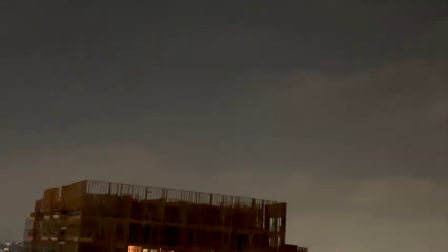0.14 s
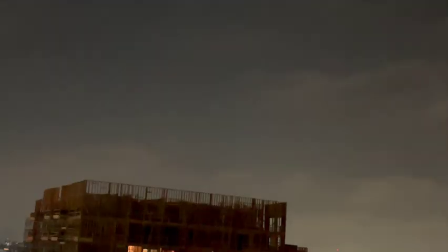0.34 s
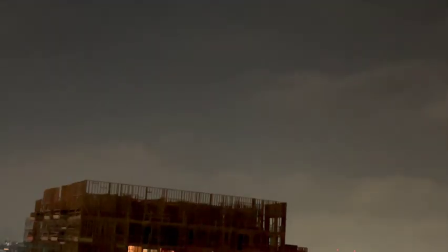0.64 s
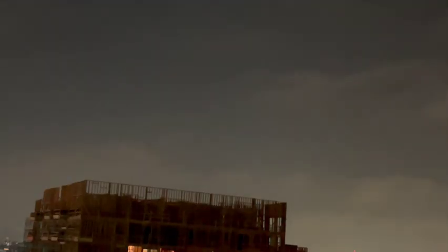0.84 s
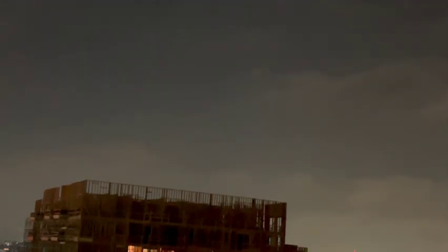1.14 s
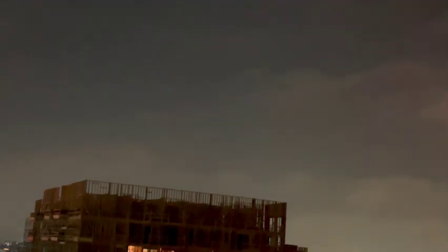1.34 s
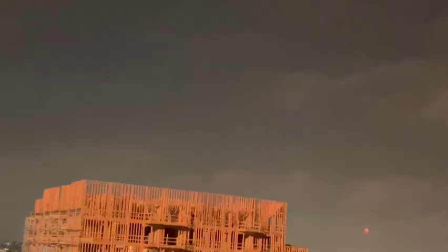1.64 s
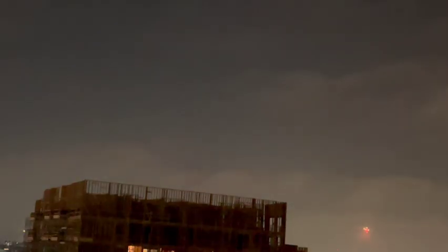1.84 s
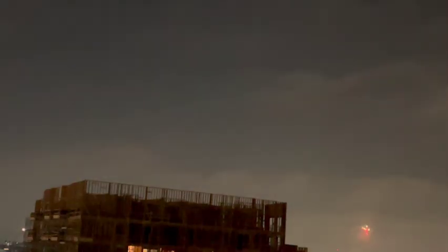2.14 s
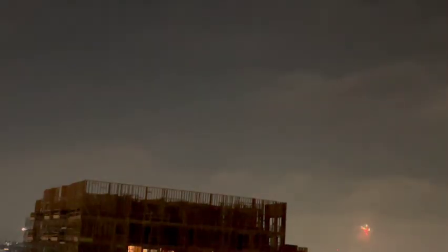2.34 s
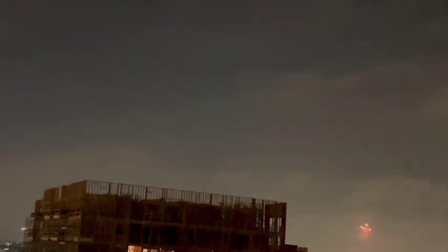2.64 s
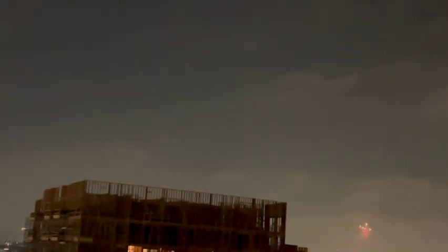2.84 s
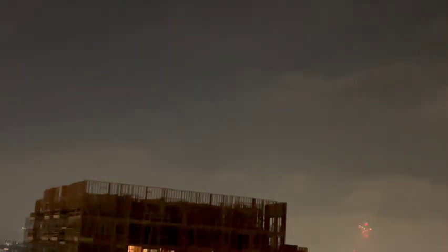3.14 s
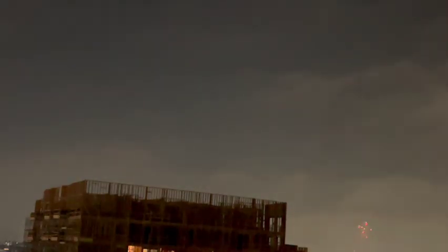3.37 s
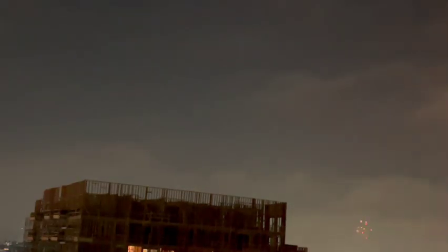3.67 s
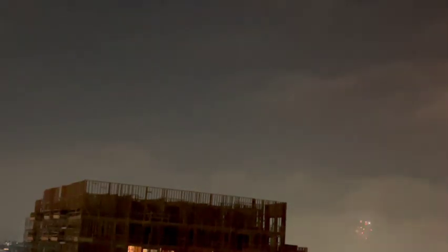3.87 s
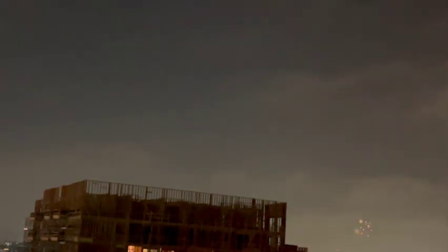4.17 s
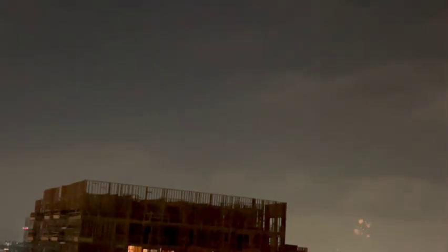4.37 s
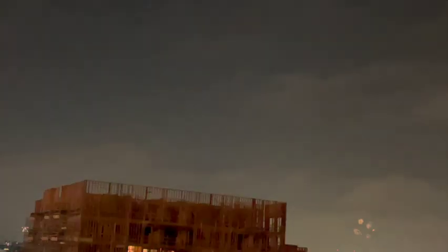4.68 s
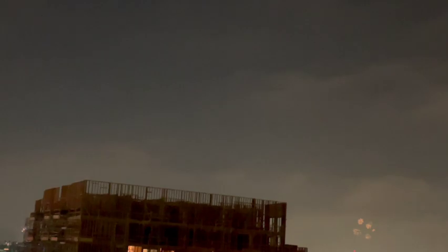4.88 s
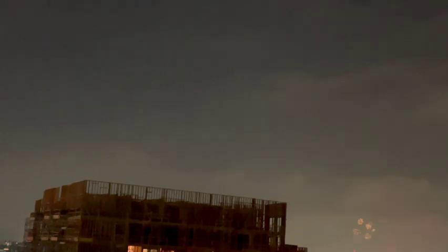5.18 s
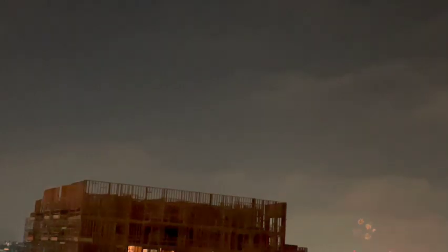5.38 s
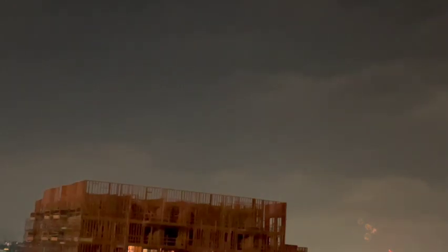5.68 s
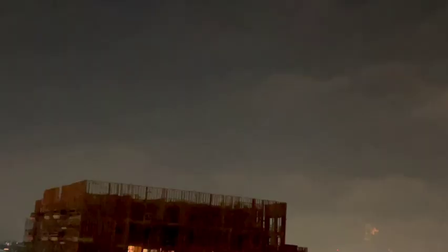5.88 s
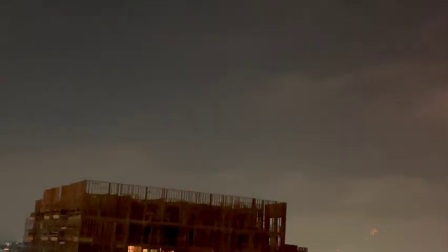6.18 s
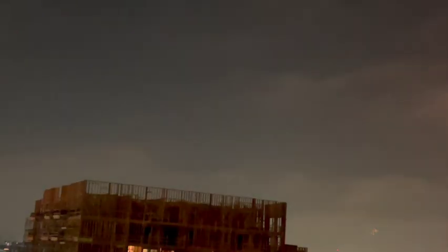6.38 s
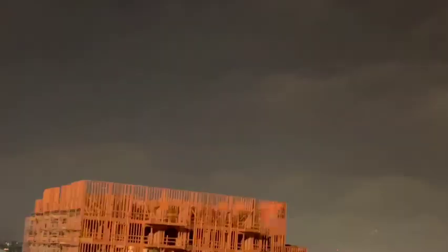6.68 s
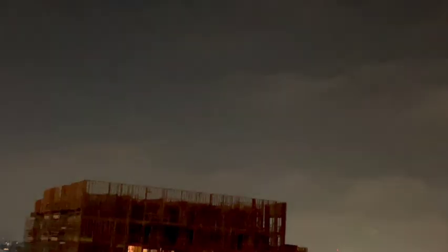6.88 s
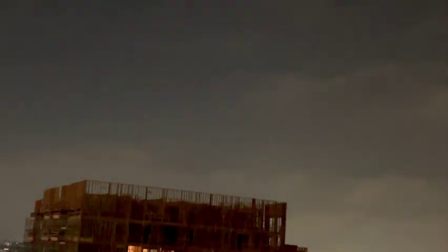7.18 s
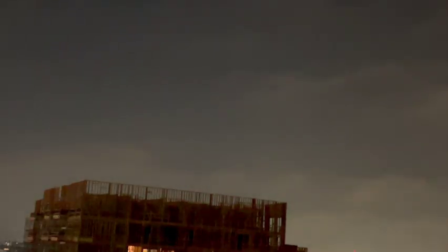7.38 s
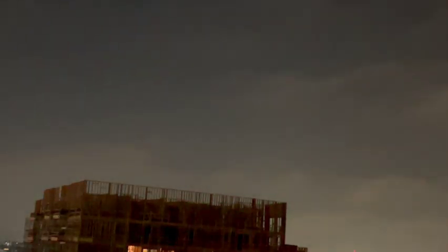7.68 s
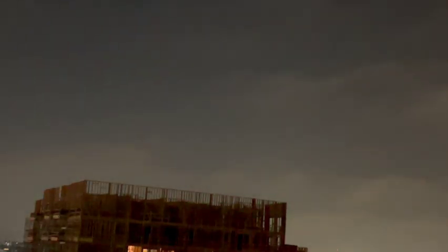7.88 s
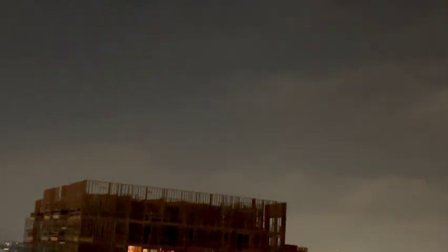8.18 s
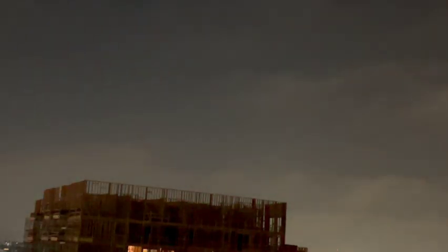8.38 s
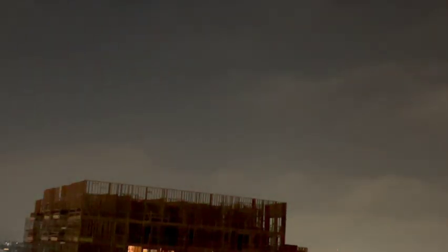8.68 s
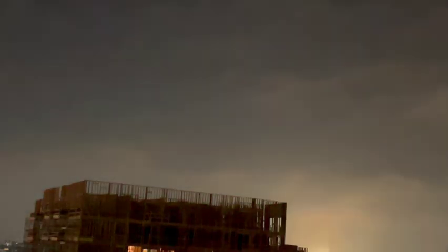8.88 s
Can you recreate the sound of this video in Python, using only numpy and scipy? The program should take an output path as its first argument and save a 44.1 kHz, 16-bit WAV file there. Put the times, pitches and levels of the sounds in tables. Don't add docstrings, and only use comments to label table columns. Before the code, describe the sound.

From a high balcony in a city at night, fireworks go off all round. Sharp cracks and dull, heavy bangs overlap, each near shell answered a moment later by a bright slap from the facades opposite and a long roll down the streets. Tiny crackles flick past. Far shells merge into lumpy rumble, roar and faint hiss, with weak car horns honking below. Wide stereo phone pickup, briefly limited on peaks.

```python
import sys
import numpy as np
from scipy import signal
from scipy.fft import rfft, irfft, next_fast_len
from scipy.io import wavfile
from scipy.ndimage import uniform_filter1d, minimum_filter1d

SR = 44100
rng = np.random.default_rng(int(sys.argv[2]) if len(sys.argv) > 2 else 0)


def bounce(signal):
    frames = np.transpose(np.atleast_2d(signal))
    limited = np.clip(frames, -1, 1)
    pcm = np.round(limited * 32767).astype(np.int16)
    wavfile.write(sys.argv[1], SR, pcm)


def undo_db(level):
    steps = np.asarray(level, float) / 20
    return 10 ** steps


N = 397761
T = np.arange(N) / SR
HZ = np.fft.rfftfreq(next_fast_len(N + SR // 2), 1 / SR)

# start_s, echo_db, bent_bang_db
SHELLS = [(0.596, -14.5, -4.5), (1.165, -16, -10), (2.319, -11.5, -6), (4.171, -16.5, -9.5),
          (5.212, -12.5, -4), (5.361, -17.5, -28), (6.093, -18, -32), (6.275, -14.5, -3.5),
          (6.348, -18, -27), (6.433, -17.5, -18), (6.51, -17, -6), (7.215, -14.5, -5.5),
          (7.302, -20.5, -27), (7.387, -17.5, 2), (7.463, -19.5, -13)]
# after_burst_s, level_db
FACADES = [
    (.036, -22),
    (.043, -13),
    (.06, -5),
    (.08, 0),
    (.105, -3),
    (.15, -9.5),
    (.22, -13.5),
    (.4, -56),
]
# pitch_hz, decay_s
STREETS_T60 = [(300, 3.2), (1000, 7.1), (3000, 4.95), (6000, 3.53), (10000, 2.05)]
STREETS_DB = -12.5
# pitch_hz, level_db_per_hz
ECHO = [(150, -36), (250, 0.5), (426, -13), (754, -10), (908, -14), (1860, -22), (2070, -17), (2530, -20.5),
        (3090, -22.5), (6000, -30), (7800, -34), (13200, -120)]
ECHO_TOP = [(6100, -30), (7400, -30), (10700, -42), (13000, -51), (15600, -50), (16000, -91)]

# start_s, peak_db, body_db (near 600 Hz), top_db (near 5 kHz), ring_hz
BANGS = [(0.38, -8, -10.5, -54, 2170), (0.781, -6.5, -9, -48, 1600), (1.223, -11, -12, -27, 2240),
         (1.341, -5.5, -15, -32, 1940), (1.415, -18, -16, -34, 2060), (2.142, -3.5, -8, -23, 1900),
         (2.199, -14, -19.5, -36, 1580), (3.198, -2.5, -12, -48, 2350), (3.306, -18, -9, -26, 2080),
         (3.463, -20, -11, -26, 1880), (3.795, -29, 1, -28, 1540), (3.913, -19.5, -5, -30, 1900),
         (4.251, -3.5, -19, -36, 2170), (4.501, -11, -18, -24, 1420), (5.516, -6, -14, -37, 1570),
         (5.557, -9, -9, -34, 2030), (5.803, -9.5, -11, -26, 2130), (5.998, -7.5, -15, -30, 1640),
         (6.702, -3, -20, -39, 1490), (6.814, -12, -17, -24, 2210), (7.669, -7.5, -21, -31, 1520),
         (7.853, -15, -9, -36, 1530), (8.19, -12, -15, -27, 1560), (8.548, -26, 30, -32, 1990)]
# pitch_hz, level_db
BLAST = [(40, -30), (75, 9.5), (160, 8.5), (500, -2.5), (900, -10), (1300, -12.5), (1750, -23.5),
         (2300, -23), (3000, -12), (5500, -21), (6800, -65)]
SHADOW_DB, SHADOW_TOP_DB, SHADOW_RING_HZ = -25.5, -41, 790
# start_s, peak_db, centre_hz
THUDS = [(0.041, -7.5, 210), (0.64, 1.5, 81.6), (0.669, -34, 234), (1.024, -5.5, 104), (1.488, -4, 113),
         (1.584, -9.5, 118), (2.195, -11.5, 144), (2.372, -9, 160), (2.401, 7.5, 182), (2.56, -11, 129),
         (2.643, 0.5, 117), (3.013, 0.5, 112), (3.27, -6, 182), (4.046, -11.5, 122), (4.344, 2.5, 151),
         (4.543, -7, 89), (4.937, -5, 199), (5.062, -7, 96), (5.263, -20.5, 150), (5.29, -0.5, 111),
         (5.387, 7, 140), (5.626, -16, 78), (5.934, -4.5, 187), (6.163, 2.5, 226), (6.421, -2, 250),
         (6.581, -7, 99.6), (7.516, 3, 140), (7.593, 0.5, 112), (7.658, -17, 143), (8.968, -5, 94.2)]
# start_s, peak_db, length_s
SPARKS = [(0.473, -39.5, 0.014), (0.982, -30.5, 0.0037), (1.034, -28.5, 0.0071), (1.595, -25, 0.0044),
          (2.752, -27.5, 0.0049), (3.306, -35, 0.0056), (3.348, -33, 0.0044), (4.395, -26.5, 0.0045),
          (4.489, -30.5, 0.0067), (4.74, -30.5, 0.004), (5.209, -32.5, 0.0026), (5.475, -39, 0.0031),
          (6.015, -28, 0.0045), (7.5526, -15, 0.0015), (8.015, -31, 0.0028), (8.797, -34, 0.0032)]
# pitch_hz, level_db
SPARK = [(1000, -8), (2500, -1.5), (5500, -11.5), (7500, -16), (10000, -28), (13500, -39)]

# after_burst_s, level_db
BOOM = [
    (.006, -37),
    (.018, -2.5),
    (.05, -1),
    (.085, 9.5),
    (.13, -5.5),
    (.3, -1),
]
# time_s, level_db
BARRAGE = [(0, -19.5), (.15, -21), (.45, -23.5), (1.0, -21), (1.8, -21), (1.95, -23), (2.3, -23),
           (3.05, -20.5), (3.4, -26.5), (4.15, -26), (4.6, -21), (5.15, -26), (5.9, -20), (7.0, -21.5),
           (8.15, -19.5), (8.45, -22.5), (8.75, -24), (9.02, -23)]
# level_db, rise_s, hold_s, sag_db_per_s, fade_db_per_s
LOW_TAIL = (-3.5, 0.43, 1.22, 7.5, 39)
FAR_TAIL = (-11.5, 0.46, 0.2, 6, 28)
# pitch_hz, level_db_per_hz
LOW = [(12, -69), (20, -32.5), (65, -1.5), (157, 0), (235, -1), (304, -13.5), (500, -19.5), (650, -41),
       (1100, -120)]
FAR = [(150, -29), (250, -4.5), (309, -7.5), (570, -1.5), (970, -12), (1220, -15), (1370, -14),
       (1510, -15.5), (3130, -21), (6000, -31), (7800, -39.5), (13200, -120)]
HISS = [(3000, -23), (5000, -23), (7400, 2), (10500, -3), (13000, -8), (15600, -12), (16000, -52)]
FAR_DB, FAR_SHARE = -33, 2.03
HISS_DB = -66

# start_s, hold_s, level_db
HONKS = [(0, .25, -47.5), (0.523, 0.041, -57), (1.253, 0.55, -47.5), (2.62, 0.072, -51), (2.76, 0.6, -47),
         (3.6, .18, -64), (4.042, 0.24, -55.5), (4.32, 0.27, -54), (4.583, 0.32, -50), (5.765, .06, -50),
         (5.946, 0.2, -52), (6.149, 0.14, -49), (8.669, 0.38, -54.5)]
# start_s, hold_s, level_db
OTHER_HONK = (8.67, .24, -51)
FAR_HONK = (4.06, .14, -59)
# multiple, level_db
HORN = [(6, -22), (8, 4.5), (9, -4.5), (10, -11), (23, -44), (26, -30)]
OTHER_HORN = [(5, -17), (6, -7), (7, -6), (8, 0), (9, -7)]
HORN_HZ, OTHER_HORN_HZ, FAR_HORN_HZ = 418.1, 434.1, 437.7
HONK_RISE_S, HONK_FADE_DB_PER_S = 0.015, 58

# pitch_hz, level_db
SIDE_DB = [(60, -26), (110, -16), (200, -15.5), (360, -1), (650, -3.4), (1170, -2), (1500, -8), (1800, -2),
           (2280, -17), (2550, -38.5), (6960, -3), (12600, -30)]
# pitch_hz, in_step_share, quarter_cycle_ahead_share
LEAN = [(60, .6, .05), (150, 0.22, 0.7), (350, 0.0045, 1), (650, 0.33, 0.43), (1200, 0.28, 0.087),
        (1900, -0.37, -.3), (3000, -0.06, .01)]
# pitch_hz, phase_rad
PORTS = [(6200, .02), (6400, .35), (6750, 2.1), (7100, 2.6), (7800, 2.6), (8300, 2.3), (8800, 1.9),
         (9800, .75), (10400, .1), (12000, -.1), (12900, -1.6), (13800, -3.05), (15300, -3.05),
         (15500, -2.3)]


def evened(x):
    return x / np.sqrt(np.mean(x ** 2) + 1e-20)


def read(points, hz, axis=1):
    table = np.transpose(points)
    return np.interp(np.log(hz + 1), np.log(table[0] + 1), table[axis])


def through(x, gain):
    size = 2 * len(HZ) - 2
    return irfft(rfft(x, size) * gain, size)[..., :N]


def add(mix, s, sound):
    part = mix[:, max(round(s * SR), 0):][:, :sound.shape[1]]
    part += sound[:, :part.shape[1]]


def smear(hz, turns=1.404, knee_hz=25, start=0.75):
    return np.exp(-2j * np.pi * (turns * np.log(1 + hz / knee_hz) + start))


def scatter(per_s, spread_db, colour):
    size_db = spread_db * np.minimum(rng.exponential(1, (2, N)), 4)
    size = undo_db(size_db) * rng.choice([-1, 1], (2, N))
    clicks = size * (rng.random((2, N)) < per_s / SR)
    return evened(through(clicks, undo_db(read(colour, HZ)) * smear(HZ)))


def bangs():
    out, hz = np.zeros((2, N)), np.fft.rfftfreq(4096, 1 / SR)
    bent = [(s, db, SHADOW_DB, SHADOW_TOP_DB, SHADOW_RING_HZ) for s, _, db in SHELLS]
    rows = BANGS + bent
    draws = rng.random((len(rows), 11))
    for (s, db, body_db, top_db, ring_hz), (lean, near, far, *late) in zip(rows, draws):
        loss = [(250, 0), (700, body_db + 9), (1150, body_db + 0.5), (1500, body_db + 4),
                (2300, body_db - 1), (4500, top_db + 12.5)]
        ring = 1 + 5.5 / (1 + 1j * (hz - ring_hz) / 95)
        walls = 1 + 0.11 * np.exp(-2j * np.pi * hz * (0.0012 + 0.00082 * near))
        walls += 0.31 * np.exp(-2j * np.pi * hz * (0.0038 + 0.0024 * far)) / (1 + hz / 1500)
        for u in late:
            walls += 0.14 * np.exp(-2 * u - 2j * np.pi * hz * 0.031 * u) * hz / (hz + 1200)
        colour = undo_db(read(BLAST, hz) + read(loss, hz))
        pulse = np.roll(irfft(colour * ring * walls * smear(hz)), 64)
        pulse = pulse / abs(pulse).max()
        add(out, s + 0.00047 - 64 / SR, undo_db(db + 0.5) * np.outer([1, lean], pulse))
    return out


def echoes():
    field, step = scatter(4000, 1.96, ECHO[:-1] + ECHO_TOP), T[::64]
    after, shape_db = np.transpose(FACADES)
    centres = np.geomspace(350, 11200, 6)
    place = np.interp(np.log(HZ + 1), np.log(centres), np.arange(6))
    out = 0
    clumps = uniform_filter1d(rng.standard_normal((len(step), 7)), size=8, axis=0)
    for k, hz in enumerate(centres):
        power = 1e-12
        for s, db, _ in SHELLS:
            since = step - s
            streets_db = STREETS_DB - 60 * np.maximum(since - .1, 0) / read(STREETS_T60, hz)
            streets = undo_db(2 * streets_db) * np.clip((since - .04) / 0.32, 0, 1)
            facades = undo_db(2 * np.interp(since, after, shape_db, -200, -200))
            power = power + undo_db(2 * db) * (streets + facades)
        level = np.sqrt(power) * undo_db(1.73 * evened(clumps[:, k] + clumps[:, k + 1]))
        band = through(field, np.clip(1 - abs(place - k), 0, 1))
        out = out + band * np.interp(T, step, level)
    return out


def thuds():
    out, hz = np.zeros((2, N)), np.fft.rfftfreq(8192, 1 / SR)
    for (s, db, centre_hz), lean in zip(THUDS, rng.uniform(-1.3, 1, len(THUDS))):
        colour_db = -9.0 * np.log2(hz / centre_hz + 1e-6) ** 2
        pulse = irfft(undo_db(colour_db) * smear(hz))
        add(out, s + 0.00289, undo_db(db - 4.5) * np.outer([1, lean], pulse / abs(pulse).max()))
    return out


def sparks():
    out, t = np.zeros((2, N)), np.arange(2000) / SR
    noise = rng.standard_normal((len(SPARKS), 2, 2000))
    for (s, db, length_s), puff in zip(SPARKS, noise):
        puff = puff + undo_db(db + 25.5) * np.diff(puff, 2, prepend=0, append=0)
        add(out, s, undo_db(db) * puff * np.exp(-t / max(length_s, 1e-4)))
    return undo_db(15.0) * through(out, undo_db(read(SPARK, HZ)))


def rumble():
    after, boom_db = np.transpose(BOOM)
    step = T[::64]
    busy_db = np.interp(step, *np.transpose(BARRAGE))
    power = undo_db(2 * busy_db) + roll(step, *LOW_TAIL)
    for s, db, _ in SHELLS:
        power = power + undo_db(2 * (db + np.interp(step - s, after, boom_db, -200, -200)))
    low = scatter(1200, 1.2, LOW) * np.interp(T, step, np.sqrt(power))
    roar_db = FAR_DB + FAR_SHARE * (busy_db - busy_db.mean())
    roar = undo_db(2 * roar_db) + roll(step, *FAR_TAIL)
    far = scatter(2500, 1.9, FAR) * np.interp(T, step, np.sqrt(roar))
    hiss = scatter(20000, .3, HISS) * undo_db(HISS_DB)
    return low + far + hiss


def roll(t, tail_db, rise_s, hold_s, sag, fade):
    power = 0
    for s, db, _ in SHELLS:
        since = t - s
        fall_db = sag * since + fade * np.maximum(since - hold_s, 0)
        rise = np.clip(since / rise_s, 0, 1) ** 2
        power = power + undo_db(2 * (db + tail_db - np.maximum(fall_db, 0))) * rise
    return power


def horns():
    out = np.zeros((2, N))
    for row in HONKS:
        add(out, *honk(*row, HORN_HZ, HORN))
    add(out, *honk(*OTHER_HONK, OTHER_HORN_HZ, OTHER_HORN))
    add(out, *honk(*FAR_HONK, FAR_HORN_HZ, [(10, -1.5)]))
    return out


def honk(start, hold_s, db, hz, partials):
    t, out = np.arange(SR + SR // 2) / SR, 0
    for k, partial_db in partials:
        rate_hz, phase, offset = rng.uniform(1.9, 12.24, 4), rng.random(4), rng.random()
        waver_db = 1.1 * np.sin(2 * np.pi * (np.outer(t, rate_hz) + phase)).sum(1)
        tone = np.sqrt(2) * np.sin(2 * np.pi * (k * hz * t + offset))
        out = out + undo_db(partial_db + waver_db) * tone
    fade_db = HONK_FADE_DB_PER_S * np.maximum(t - hold_s, 0)
    shape = np.minimum(t / HONK_RISE_S, 1) * undo_db(db - fade_db)
    return start, np.outer([1, 4.0], out * shape)


def scene():
    front, other = echoes() * undo_db([[0], [2.5]]) + bangs() + thuds() + sparks() + rumble() + horns()
    copy = read(LEAN, HZ) + 1j * read(LEAN, HZ, axis=2)
    free = np.sqrt(np.clip(1 - abs(copy) ** 2, 0, 1))
    width, half = undo_db(read(SIDE_DB[:-2], HZ)), read(PORTS, HZ) / 2
    mid = through(front, np.cos(half))
    side = through(front, width * copy + 1j * np.sin(half))
    side = side + through(other, width * free + 0.22 * np.sin(half))
    return np.array([mid + side, mid - side])


def top_cut(x):
    return signal.sosfilt(signal.butter(12, 15800, fs=SR, output="sos"), x)


def record(dry):
    ceiling = .93
    room = ceiling / np.maximum(abs(dry).max(0), ceiling)
    gain = uniform_filter1d(minimum_filter1d(room, size=133), size=133)
    return top_cut(dry * gain)


dry = scene()
out = record(dry)
bounce(out)
```